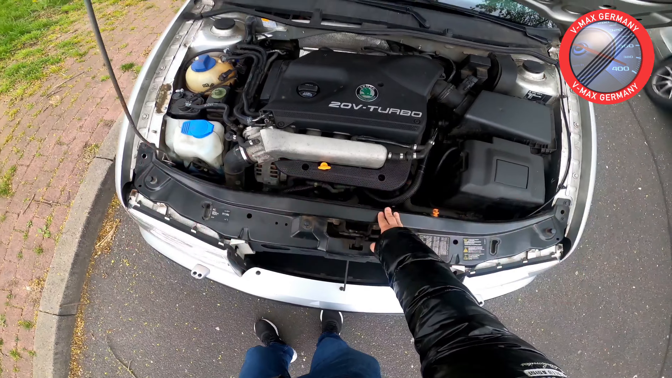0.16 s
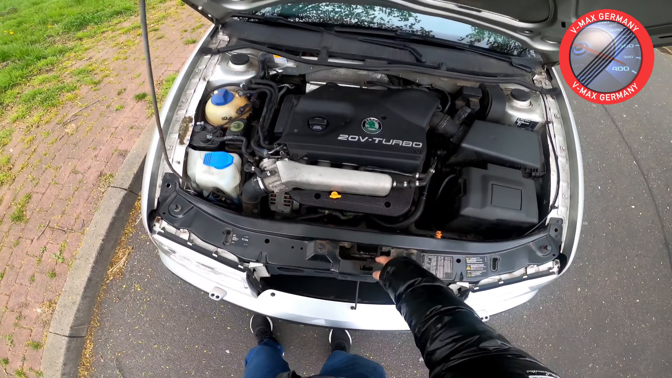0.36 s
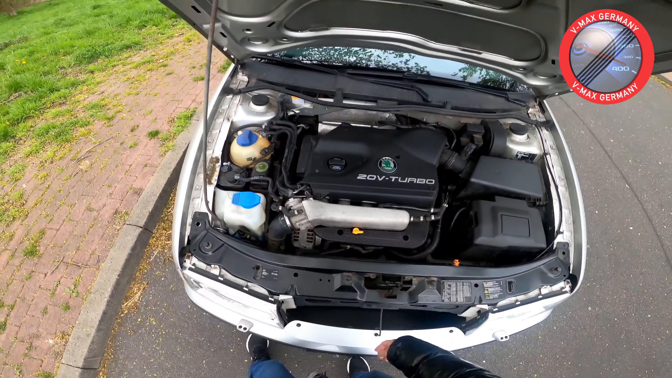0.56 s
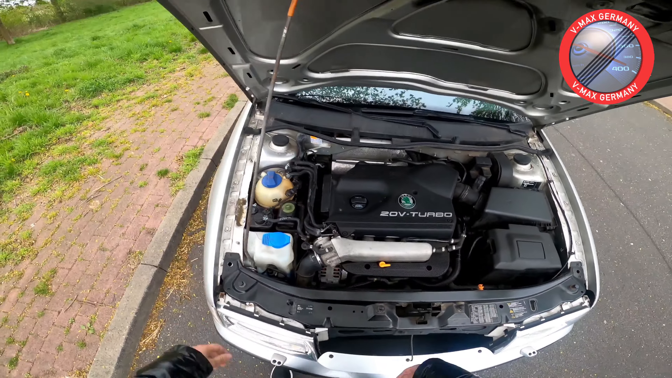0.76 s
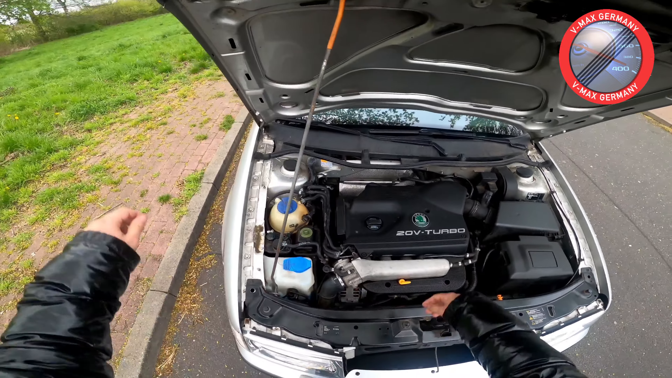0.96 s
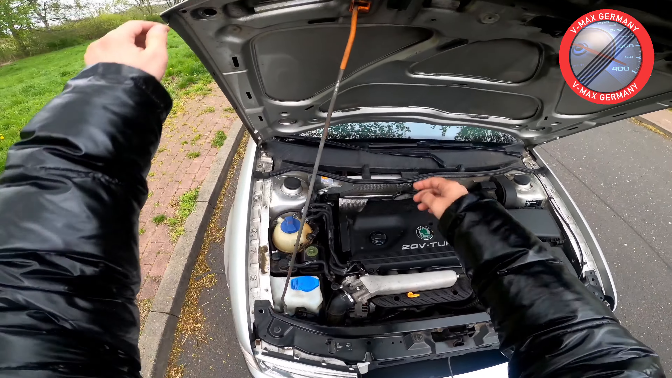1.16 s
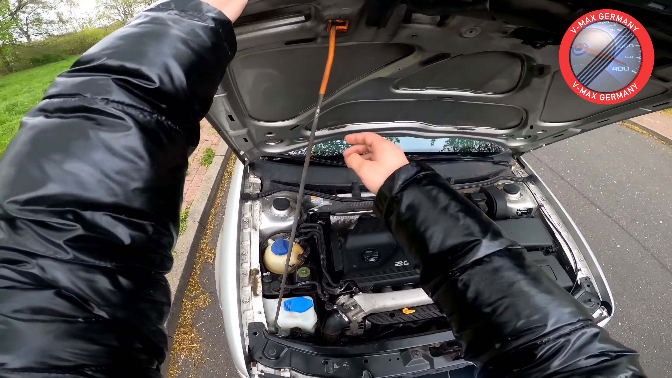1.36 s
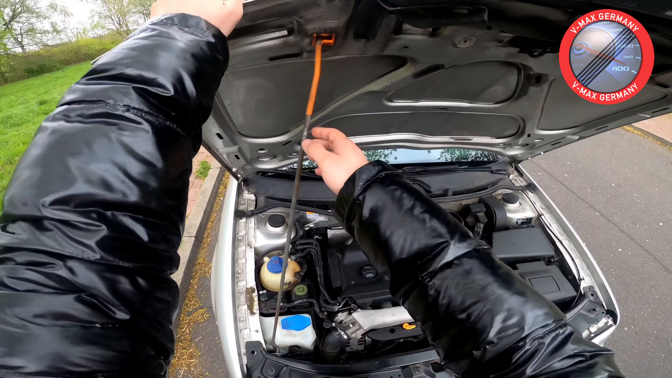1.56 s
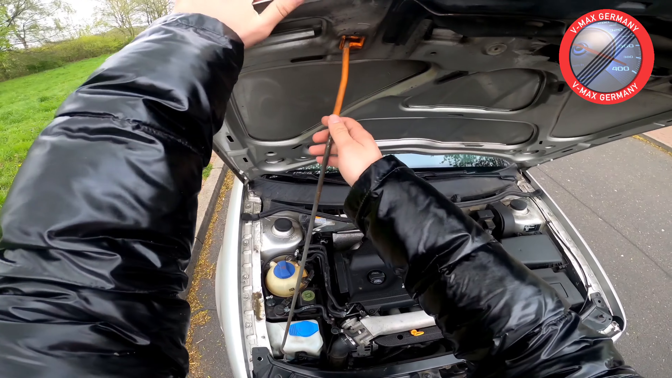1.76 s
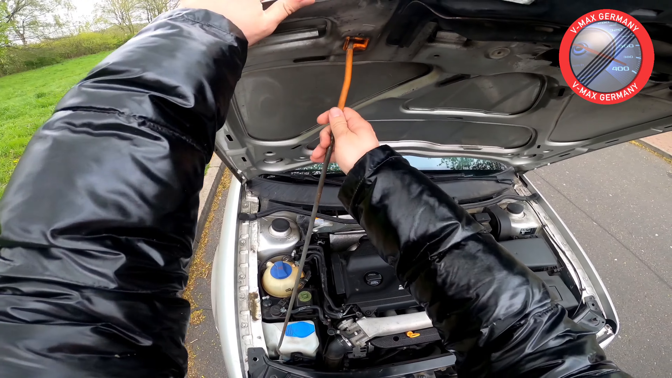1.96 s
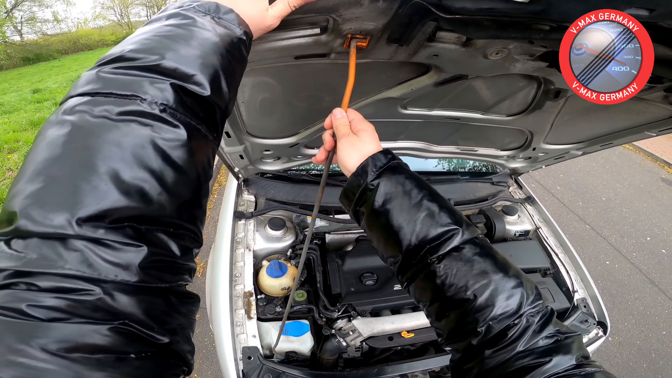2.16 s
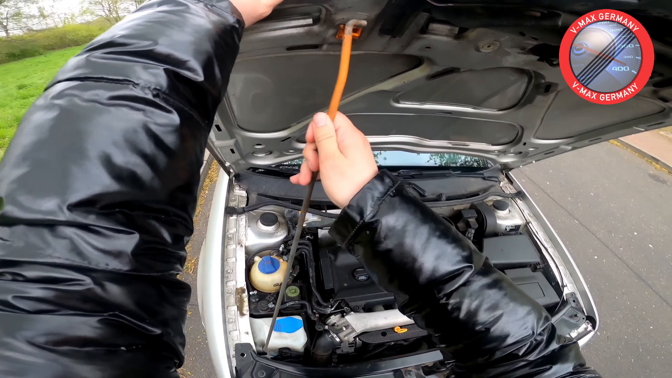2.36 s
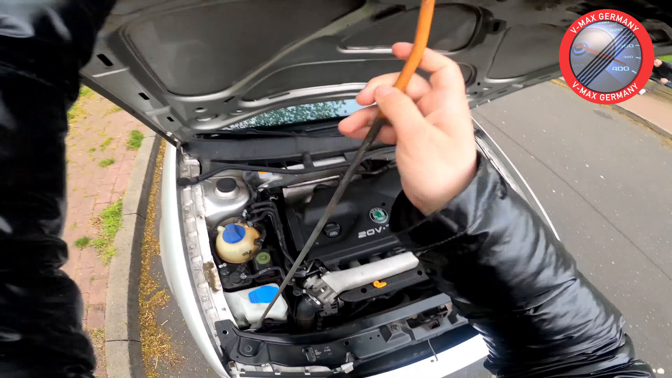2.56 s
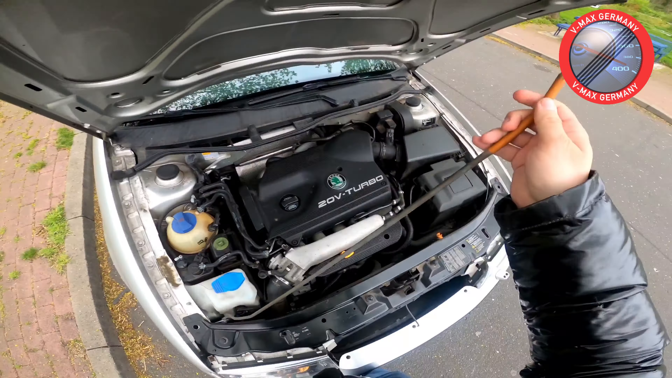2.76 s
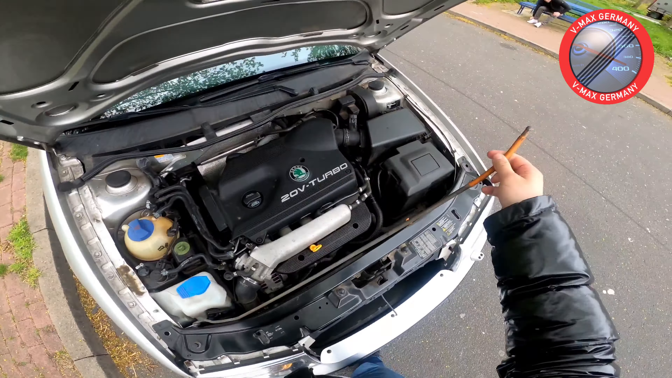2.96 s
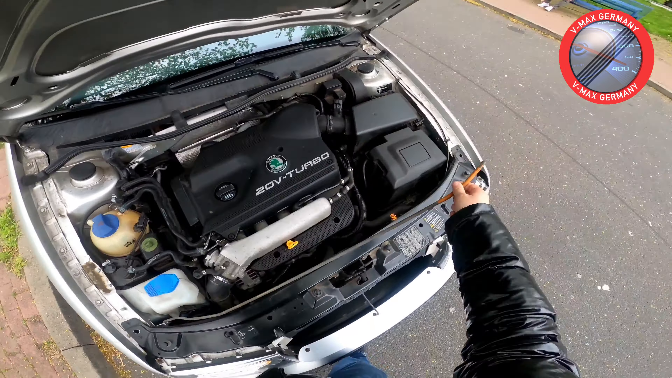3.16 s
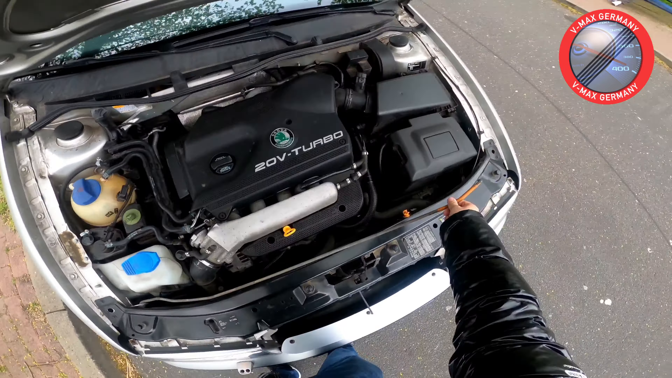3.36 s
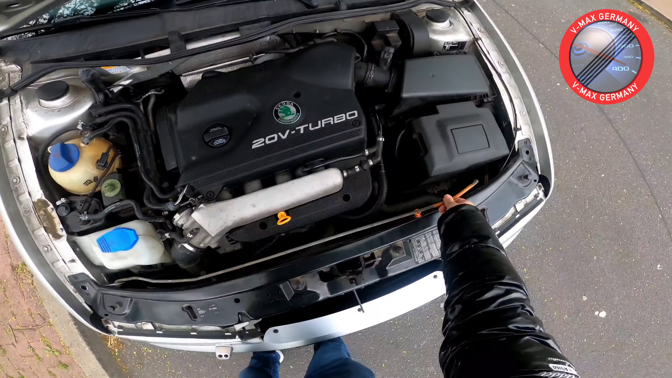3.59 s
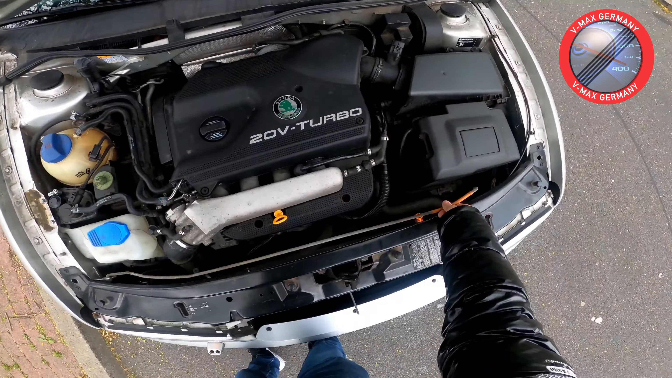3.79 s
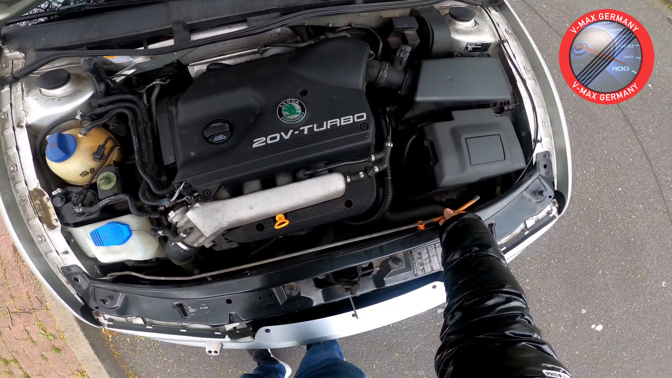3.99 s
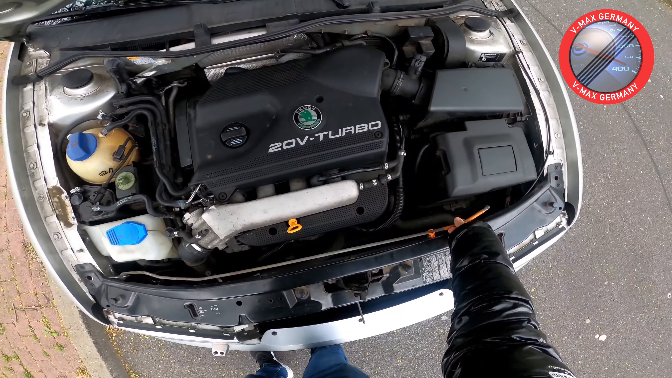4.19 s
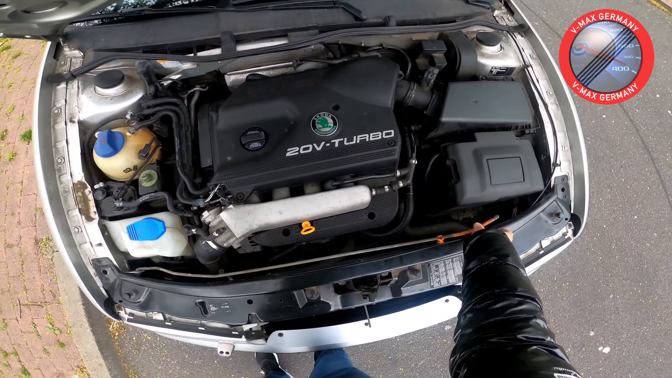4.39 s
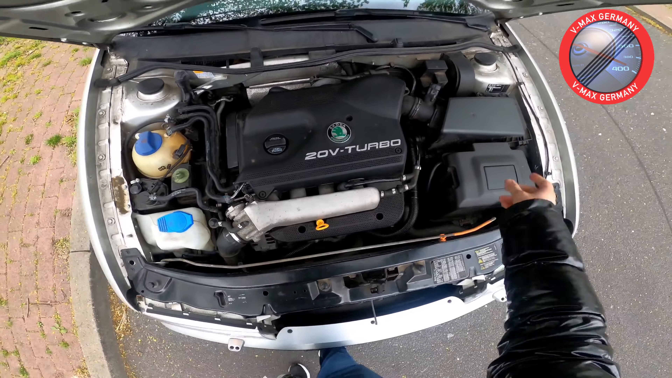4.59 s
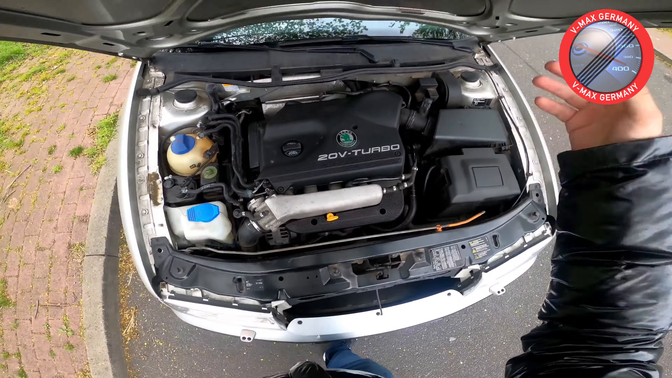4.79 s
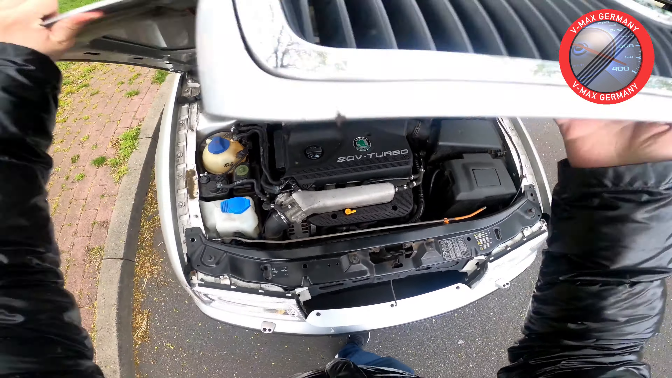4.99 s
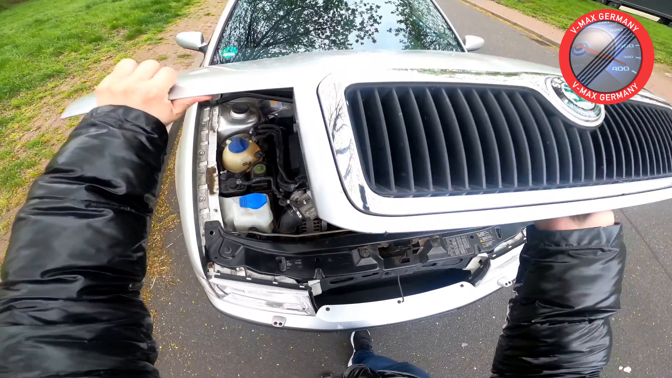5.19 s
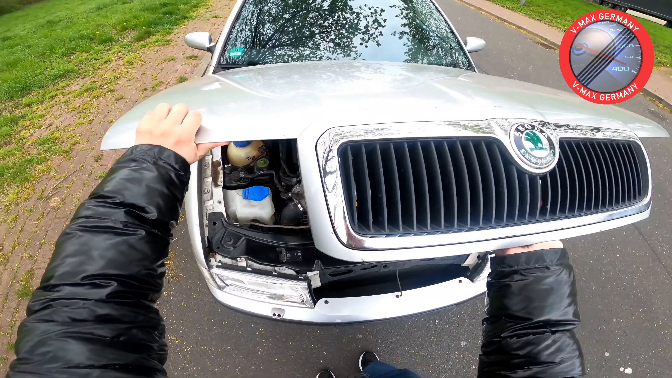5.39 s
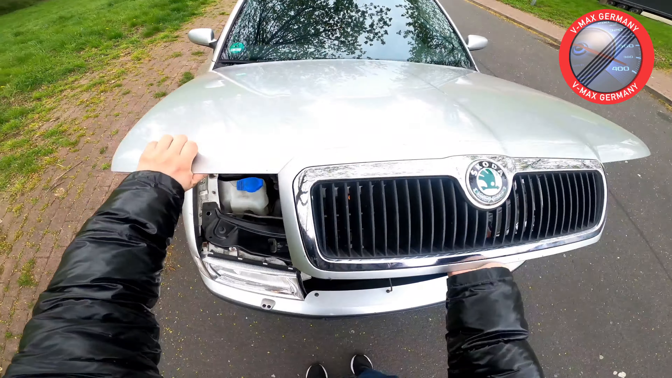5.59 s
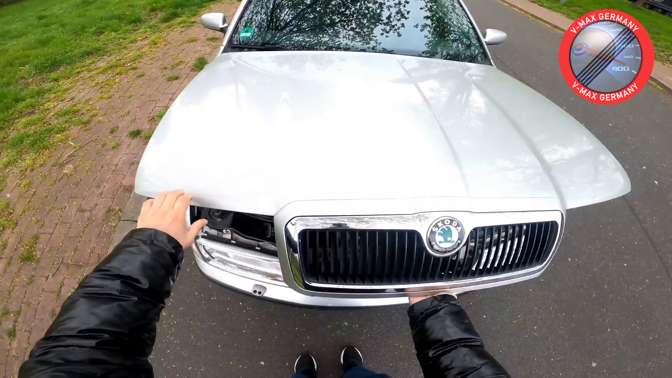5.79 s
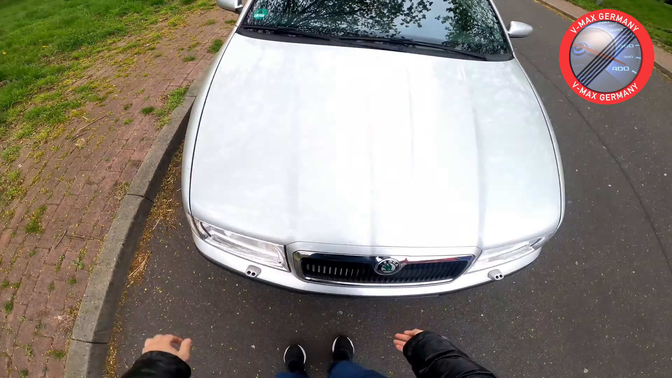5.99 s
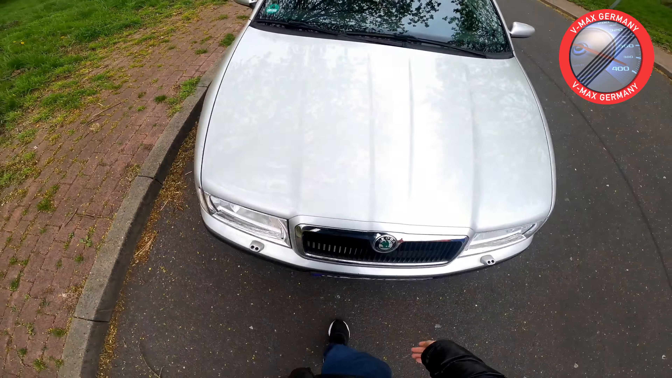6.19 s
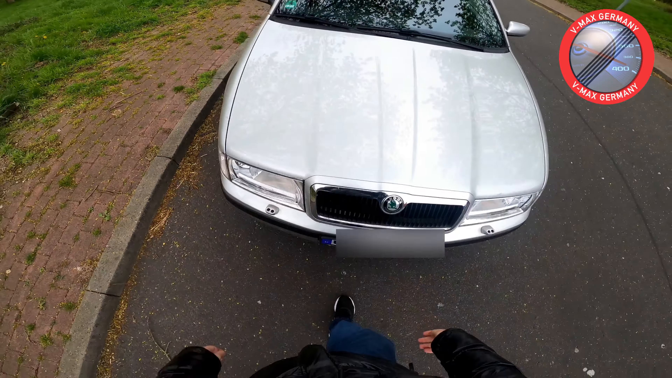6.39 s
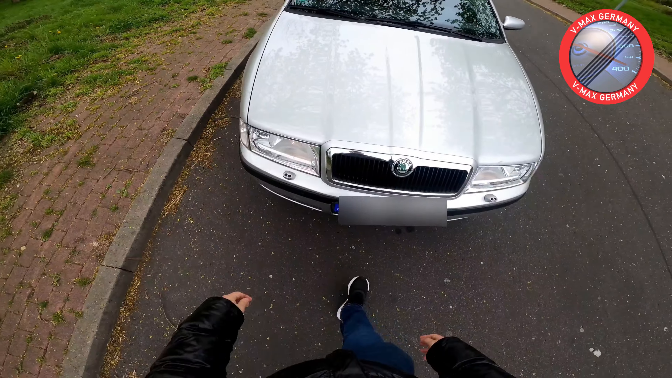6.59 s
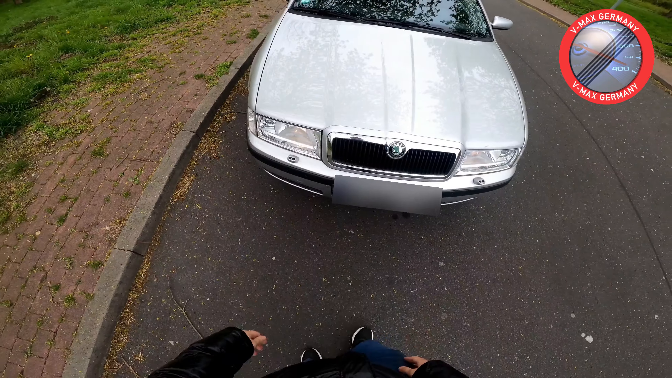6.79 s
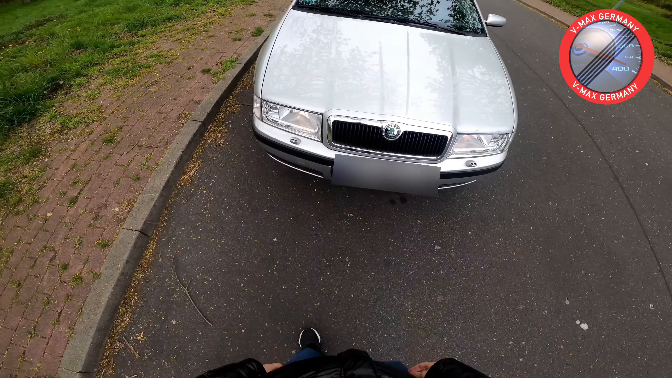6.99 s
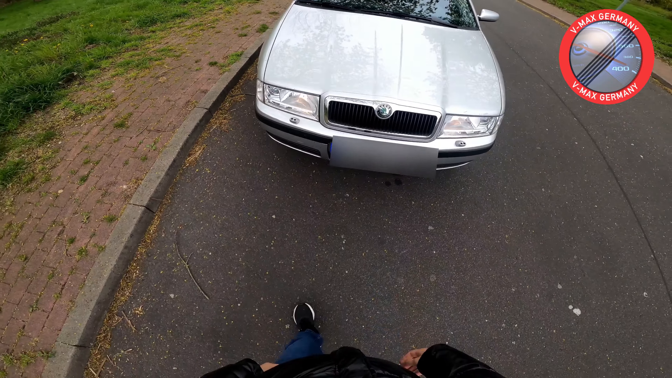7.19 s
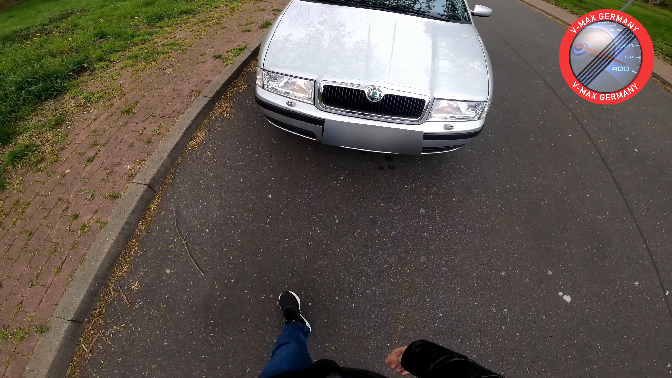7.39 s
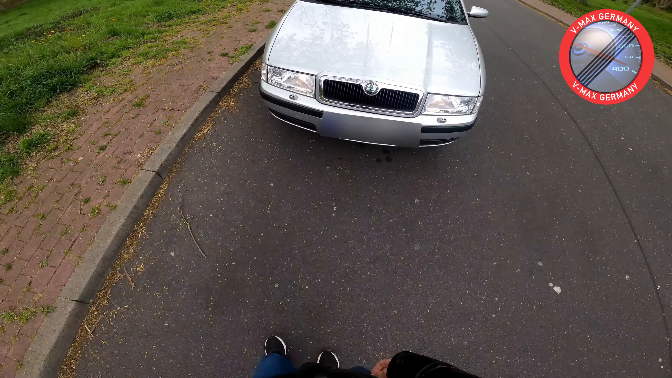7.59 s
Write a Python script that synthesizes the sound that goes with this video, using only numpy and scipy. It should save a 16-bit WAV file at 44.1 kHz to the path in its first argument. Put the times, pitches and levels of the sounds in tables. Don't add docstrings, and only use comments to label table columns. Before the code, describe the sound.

Heard from a chest-worn stereo microphone outdoors: a faint, steady idle, fast ticking and airy hiss, with distant road noise. Light dull taps mark the prop rod being unhooked and clipped down. The engine sound dulls as the bonnet sinks, then one huge metallic slam booms and shakes loose parts. Afterwards the quiet background lifts in level and bright tyre noise from an approaching vehicle grows until the end.

```python
import sys
import numpy as np
from scipy import signal
from scipy.io import wavfile
from scipy.ndimage import uniform_filter1d

SR = 44100
rng = np.random.default_rng(int(sys.argv[2]) if len(sys.argv) > 2 else 0)


def amplitude_ratio(level_db):
    exponent = np.asarray(level_db, float) / 20
    return 10 ** exponent


def bounce(signal):
    frames = np.transpose(np.atleast_2d(signal))
    limited = np.clip(frames, -1, 1)
    pcm = np.round(limited * 32767).astype(np.int16)
    wavfile.write(sys.argv[1], SR, pcm)


N = 337350
T = np.arange(N) / SR
SLAM_S = 6.09
# [start_s, level_db]
SIGHT = [(0, 0.5), (.8, -0.5), (2.3, -2), (3.4, 0), (4.2, 2.5), (5.0, 0.1), (5.4, -3.5), (6.08, -9),
         (6.3, -11.5), (6.8, -9.5), (7.65, -7)]


def evened(x):
    return x / np.sqrt(np.mean(x ** 2) + 1e-20)


def read(points, hz):
    f, value = np.transpose(points)
    return np.interp(np.log(hz + 1), np.log(f + 1), value)


def steady(points):
    return lambda hz, t: read(points, hz) + 0 * t


def curves(rows, t=T):
    s, *columns = np.transpose(np.vstack(rows))
    return [np.interp(t, s, c) for c in columns]


def add(mix, s, sound):
    part = mix[..., round(s * SR):][..., :sound.shape[-1]]
    part += sound[..., :part.shape[-1]]


def noise(colour_db, size=1024, patchy_db=4.5, length=N, tighter=1):
    # [pitch_hz, likeness (0-1)]
    same_points = [(60, 0.99), (130, 0.99), (290, 0.99), (640, 0.88), (1410, 0.79), (3100, 0.5),
                   (6820, 0.21), (15000, 0.06)]
    # [pitch_hz, level_db]
    lean_points = [(60, 1.5), (110, -0.5), (200, 1.5), (380, -0.5), (700, 0.5), (1290, 0.5), (2380, 2),
                   (4400, -0.5), (8120, -1.5), (15000, -6.5)]
    # [pitch_hz, lead_radians]
    lead_points = [(0, 0.42), (1890, -0.3), (4130, -0.64), (4390, 0.99), (7060, -1.45), (7920, -1.6),
                   (8790, -0.59), (9730, -0.5), (12500, -0.46), (16500, 0.1)]
    frames = length * 4 // size + 5
    hz = np.fft.rfftfreq(size, 1 / SR)[:, None]
    a, b, c, d, patches = rng.standard_normal((frames, len(hz), 5)).T
    patches = uniform_filter1d(patches, size=10, axis=0)
    patches = evened(uniform_filter1d(patches, size=12, axis=1))
    same = np.clip(read(same_points, hz), 0, 1) ** tighter
    left = a + 1j * b
    right = same * left + np.sqrt(1 - same ** 2) * (c + 1j * d)
    right = right * np.exp(-1j * read(lead_points, hz))
    lean = amplitude_ratio(read(lean_points, hz) / 2)
    z = np.array([left * lean, right / lean])
    z *= amplitude_ratio(colour_db(hz, np.arange(frames) * size / 4 / SR) + patchy_db * patches)
    return evened(signal.istft(z, nperseg=size, noverlap=size * 3 // 4)[1][:, :length])


def resonate(x, hz, width):
    turn = np.exp(2j * np.pi * np.cumsum(hz * np.ones(N)) / SR)
    r = np.exp(-np.pi * width / SR)
    for _ in range(2):
        x = evened((turn * signal.lfilter([1 - r], [1, -r], x / turn)).real)
    return x


def ring(modes, seconds):
    t = np.arange(round(seconds * SR)) / SR
    return sum(amplitude_ratio(db - 60 * t / t60) * np.sin(2 * np.pi * hz * t) for hz, db, t60 in modes)


def surroundings():
    # [pitch_hz, level_db per Hz]
    rumble_colour = [(8.8, -35), (15, -3), (64, 6), (81, -11.5), (102, 2), (120, -1), (140, -5.5),
                     (225, -16.5), (260, -15), (340, -41), (570, -120)]
    # [pitch_hz, level_db re rumble]
    hums = [(23.3, -23), (30, -5), (40, -17.5), (51, -50), (60, -5), (90, -10), (112.5, -11)]
    # [start_s, nearness (0-1)]
    traffic = [(0, 0.86), (.7, 0.7), (1.7, 0.31), (6.1, 0.09), (6.7, 0.11), (7.55, 0.31)]
    # [pitch_hz, level_db per Hz]
    road_far = [(90, -34), (150, -2), (290, -3.5), (435, -3.5), (530, -15.5), (660, -10.5), (820, -12.5),
                (1000, -1), (1130, -6), (1280, -3), (1500, -7.5), (2090, -10.5), (2800, -22.5), (4500, -46)]
    road_near = [(90, -33), (150, -6), (240, -4), (400, -10), (620, -3), (760, -9), (960, 0.5), (1250, -6),
                 (2060, -18), (2800, -21.5), (4500, -59)]
    rumble_db, far_road_db, nearing_db, share_of_bay = -52.5, -58.5, 10.5, 0.34

    rumble = amplitude_ratio(-3) * noise(steady(rumble_colour), size=4096, patchy_db=1)
    for hz, db in hums:
        waver = evened(signal.lfilter([1], [1, -.99995], rng.standard_normal((2, N))))
        hum = np.sqrt(2) * np.sin(2 * np.pi * hz * T + .3 * waver[1])
        rumble += amplitude_ratio(db + 1.5 * waver[0]) * hum

    near = lambda t: np.clip(curves(traffic, t)[0], 0, 1)
    shape = lambda hz, t: (1 - near(t)) * read(road_far, hz) + near(t) * read(road_near, hz)
    power_db = lambda hz, t: 10 * np.log10(np.mean(amplitude_ratio(2 * shape(hz, t)), axis=0))
    road = noise(lambda hz, t: shape(hz, t) - power_db(hz, t), patchy_db=1.0)
    road_db = far_road_db + nearing_db * near(T) + share_of_bay * curves(SIGHT)[0]
    return amplitude_ratio(rumble_db) * rumble + amplitude_ratio(road_db) * road


def engine():
    # [start_s, firings_per_s]
    idle = [(0, 23.27), (2.3, 23.27), (3.2, 23.46), (4.3, 23.27), (6.1, 23.07)]
    cylinder_db = [-1, -1.5, 1.5, -.5]
    # [pitch_hz, level_db per Hz]
    tick_colour = [(1500, -25), (2800, -3.5), (4500, -11), (8000, -10.5), (10800, -16), (11500, -8.5),
                   (12000, -16), (12500, -11), (13200, -26), (15500, -43)]
    clatter_colour = [(1900, -25), (2600, 0), (2900, -7), (3250, -1), (3700, -9), (4500, -8), (6500, -16),
                      (9000, -35)]
    hiss_colour = [(1060, -38), (1800, -29), (2260, -6.5), (2670, 1), (4170, -2.5), (4450, -3), (4740, -4),
                   (8210, -11.5), (11800, -20), (14500, -28), (16000, -60)]
    # [pitch_hz, width_hz, level_db]
    hollows = [(645, 100, 0), (3870, 200, -13), (4430, 180, -11.5)]
    # [starts_s, arrived_s, leaves_s, returned_s]
    back_s = (1.0, 1.6, 2.9, 3.6)
    # [starts_s, cupped_s, leaves_s, shut_s]
    lowering_s = (4.9, 5.3, 6.05, 6.1)
    lean_s, lean_width_s = 3.82, 1.12
    shade_db_per_khz = .055

    firings = np.cumsum(curves(idle)[0]) / SR - .08
    count = firings.astype(int)
    size_db = np.take(cylinder_db, count % 4) + 1.5 * rng.standard_normal(200)[count]
    running = T < SLAM_S
    since = (firings - count) / 30 * running
    away = 1 - np.exp(-((T - lean_s) / lean_width_s) ** 4)
    tick_db = 2.5 + 2.5 * (1 - away)
    gate = amplitude_ratio(size_db + tick_db - 60 * since / .035) * (1 - np.exp(-since / .002))
    ticks = amplitude_ratio(4) * gate * noise(steady(tick_colour), size=256, patchy_db=2.5, tighter=.6)
    swing = amplitude_ratio(tick_db - 2) * np.cos(np.pi * (firings - .05)) ** 20 * running
    clatter = swing * noise(steady(clatter_colour), size=256, patchy_db=1.5, tighter=.6)
    shade_db = lambda hz, t: shade_db_per_khz * curves(SIGHT, t)[0] * hz / 1000
    hiss = amplitude_ratio(0.5) * noise(lambda hz, t: read(hiss_colour, hz) + shade_db(hz, t), size=512, patchy_db=2.0)
    hiss_db = -64 + curves(SIGHT)[0]

    air = rng.standard_normal(N)
    hollow = sum(amplitude_ratio(db - (hz > 1000) * 20 * away) * resonate(air, hz, width)
                 for hz, width, db in hollows)
    throb = 1 + .4 * np.cos(2 * np.pi * (firings - .1))
    hollow_db = -61.5 - 17.5 * away
    forward = np.interp(T, back_s, [1, 0, 0, 1])
    whine = amplitude_ratio(-69.5 - 19 * forward) * resonate(air, 2080, 260)
    cupped = np.interp(T, lowering_s, [0, 1, 1, 0]) * resonate(air, 580, 260)
    bay = amplitude_ratio(hollow_db) * throb * hollow + whine + amplitude_ratio(-68.5) * cupped
    return amplitude_ratio(hiss_db) * (hiss + ticks + clatter) + bay


def prop_rod():
    # [start_s, level_db, pitch_hz, t60_s, second_pitch_hz]
    knocks = [(0.799, -47, 955, 0.042, 910), (2.327, -48.5, 960, 0.05, 1090),
              (2.386, -44.5, 372, 0.087, 503), (2.387, -47, 1206, 0.06, 2800),
              (3.815, -46, 920, 0.033, 1490), (4.062, -50, 2000, 0.037, 1700),
              (4.067, -40.5, 177, 0.11, 94), (4.086, -41.5, 210, .12, 151),
              (4.979, -45.5, 2580, 0.0067, 3610), (5.155, -54, 4530, 0.022, 7400),
              (6.803, -46.5, 3200, .03, 3680), (6.822, -52, 3360, 0.024, 3700)]
    out, t = np.zeros(N), np.arange(4000) / SR
    band = signal.butter(2, [300, 3200], "bandpass", fs=SR)
    for s, db, hz, t60, second_hz in knocks:
        add(out, s, ring([(hz, db, t60), (second_hz, db - 5.5, t60)], .3))
        scuff = evened(signal.lfilter(*band, rng.standard_normal(len(t))))
        scuff_db = db - 8.5 - 60 * t / (0.52 * t60)
        add(out, s, amplitude_ratio(scuff_db) * np.minimum(t / 0.0026, 1) * scuff)
    return out


def air_steps():
    # [start_s, level_db, share_before (0-1), relief_s, edge_s]
    steps = [
        (6.1175, -13, .05, .008, .00003),
        (6.1357, 0, .8, .001, .00001),
        (6.149, -4, .4, .0015, .0005),
        (6.164, -6, .4, .003, .0008),
        (6.216, -12, .4, .004, .001),
        (6.257, -13, .3, .002, .001),
    ]
    squeeze_s = .0018
    out, t = np.zeros((2, N)), np.arange(-2000, 2000) / SR
    for s, db, share, relief, edge in steps:
        released = .5 + .5 * np.tanh(t / edge)
        before = share * np.exp(-abs(t) / squeeze_s)
        after = (1 - share) * np.exp(-abs(t) / relief)
        add(out, s + t[0], amplitude_ratio(db) * ((1 - released) * before - released * after)[None])
    return out


def slam():
    # [start_s, body_db, boom_db, panel_db, rattle_db]
    blows = [
        (6.0904, -58, -49, -56, -37.5),
        (6.101, -62, -62, -61, -35),
        (6.1175, -13, -34, -19, -29),
        (6.1357, -34, -15.5, -10.5, -23),
        (6.149, -38, -32, -31, -41),
        (6.164, -30, -28, -20, -29.5),
        (6.211, -21, -48, -20.5, -33),
        (6.252, -18, -20.5, -31, -40),
        (6.314, -36, -33, -40, -44.5),
        (6.349, -37, -30.5, -42, -45.5),
    ]
    # [pitch_hz, level_db, t60_s]
    body = [(44.6, -18, 0.75), (62.8, -12, 0.92)]
    boom = [(77.5, -0.5, 0.33), (101.6, 2, 0.15), (114.7, -19, 0.38), (157.2, -10.5, 0.42),
            (221.7, -16, 0.54)]
    panel = [(208, -4.5, 0.69), (259, -10.5, 0.6), (315, -6.5, 0.77), (390.8, 2, 0.48), (449.6, 1, 0.28),
             (509, -1.5, 0.26), (553, -7, 0.17), (615, -1, 0.15), (714, -6, 0.14), (900, 1.5, 0.093),
             (955, -4.5, 0.16), (1028, -9.5, 0.38), (1288, -3, 0.17), (2050, -22, 0.19)]
    # [pitch_hz, level_db, t60_s]
    hook = [(2130, -37, .05), (1290, -41, .05), (2950, -47, .02), (3600, -50, .015)]
    latch = [(1590, -22.5, .1), (2130, -29, .06), (1290, -30, .06), (651, -39.5, 1.3)]
    # [pitch_hz, t60_s]
    rattle_colour = [(100, -13), (300, -1), (600, -10), (1200, -10), (2500, -23), (6500, -38.5),
                     (10500, -42.5), (12000, -51), (16000, -61)]
    rattle_t60 = [(100, 0.63), (1500, 0.25), (5000, 0.25), (15000, 0.11)]

    out = air_steps()
    for k, (s, body_db, boom_db, panel_db, rattle_db) in enumerate(blows):
        spread = rng.uniform(-4, 4, len(panel))
        struck = [(hz, db + d, t60) for (hz, db, t60), d in zip(panel, spread)]
        rings = amplitude_ratio(body_db) * ring(body, 1.2) + amplitude_ratio(boom_db) * ring(boom, 1.2)
        rings = rings + amplitude_ratio(panel_db - 13) * ring(struck, 1.2)
        add(out, s, -rings[None] * np.minimum(np.arange(len(rings)) / 60, 1))

        dull_db, quick = (-1.5, .8) if k == 2 else (0, 1)
        decay_db = lambda hz, t: 60 * t / read(rattle_t60, hz) / quick
        colour_db = lambda hz, t: read(rattle_colour, hz) - dull_db * hz / 1000 - decay_db(hz, t)
        rattle = noise(colour_db, size=256, length=SR // 2, tighter=0.88)
        rise = .012 * SR if s > 6.23 else 120
        add(out, s, amplitude_ratio(rattle_db - 10.0) * rattle * np.minimum(np.arange(SR // 2) / rise, 1))
        if k in (0, 2):
            add(out, s, ring([hook, latch][k // 2], 1)[None])
    return out


def gain_db():
    jump_db, rise_s = 13, .2
    climb_from_s, climb_db_per_s = 6.73, 6
    jump = np.clip((T - SLAM_S) / rise_s, 0, 1)
    return jump_db * jump + climb_db_per_s * np.maximum(T - climb_from_s, 0)


def passing_car():
    # [start_s, level_db, treble_loss_db_per_khz]
    rush = [
        (6.6, -86, 7),
        (6.85, -51, 5),
        (7.08, -53.5, 1.5),
        (7.25, -48.5, .9),
        (7.65, -45.5, 1.1),
    ]
    # [pitch_hz, level_db per Hz]
    tyres = [(1410, -14), (2400, -3), (4490, -3.5), (5350, -8.5), (7830, -0.5), (12000, -10), (15100, -26),
             (16000, -73)]
    # [pitch_hz, width_hz, level_db re rush]
    tread = [(3600, 300, -10), (4500, 250, -11), (6350, 450, -4), (7800, 500, -4)]
    closest_s, bend_s, bend = 7.4, .25, .035
    squeak_s, squeak_half_s = 6.97, .2

    rush_db, loss_db = curves(rush)
    far_db = lambda hz, t: -curves(rush, t)[1] * (hz - 3000) / 1000
    hiss = noise(lambda hz, t: read(tyres, hz) + far_db(hz, t), size=512, patchy_db=1.0, tighter=0.34)
    white = noise(lambda hz, t: 0 * hz * t, size=512, patchy_db=1.5, tighter=0.18)
    slide = 1 - bend / 2 + bend * np.minimum(((T - closest_s) / bend_s) ** 2, 1)
    for hz, width, db in tread:
        line_db = db - 1.1 * loss_db * (hz - 3000) / 1000
        hiss += amplitude_ratio(line_db) * resonate(white, hz * slide, width)

    off = np.clip((T - squeak_s) / squeak_half_s, -1, 1)
    squeak_hz = 4000 + 2900 * squeak_half_s * off
    squeak = resonate(white, squeak_hz, 150) * (abs(off) < 1)
    fade_in = np.clip((T - 6.4) / 0.19, 0, 1)
    return amplitude_ratio(rush_db) * hiss * fade_in + amplitude_ratio(-61.5 - 10 * off ** 2) * squeak


def scene():
    return amplitude_ratio(gain_db()) * (surroundings() + engine()) + prop_rod() + slam() + passing_car()


def band_limit(x):
    return signal.sosfilt(signal.butter(12, 17000, fs=SR, output="sos"), x)


def record(dry):
    low_cut = signal.butter(2, 16, "highpass", fs=SR, output="sos")
    cut = signal.sosfilt(low_cut, dry)
    wide, narrow = (signal.oaconvolve(cut, signal.firwin(511, hz, window=("kaiser", 8), fs=SR)[None], "same")
                    for hz in (16600, 15000))
    sharp = np.interp(T, [6.112, 6.115, 6.138, 6.142], [0, 1, 1, 0])
    return band_limit(narrow + sharp * (wide - narrow))


dry = scene()
out = record(dry)
bounce(out)
```